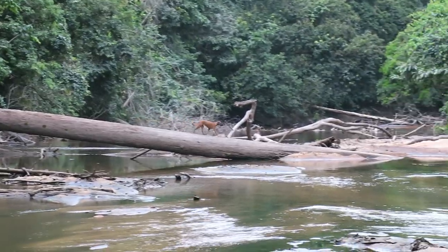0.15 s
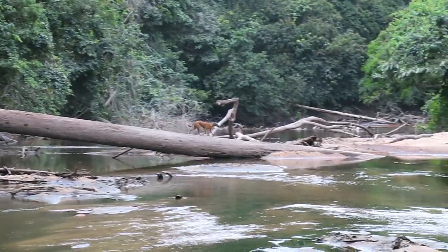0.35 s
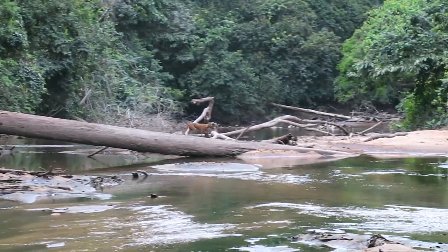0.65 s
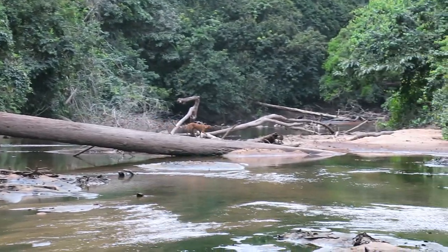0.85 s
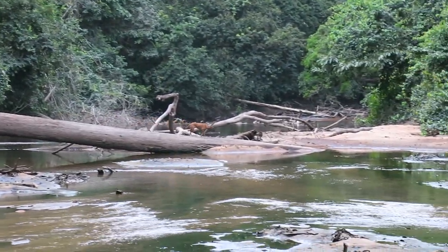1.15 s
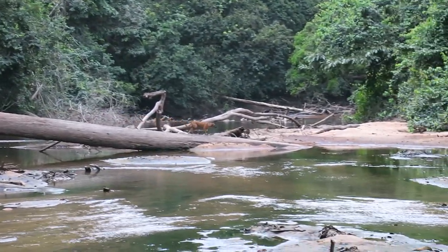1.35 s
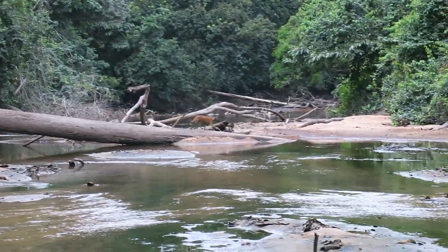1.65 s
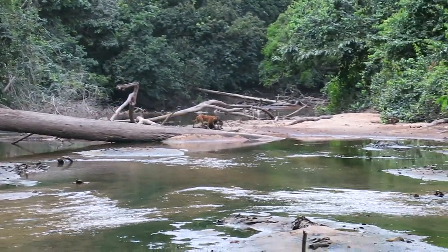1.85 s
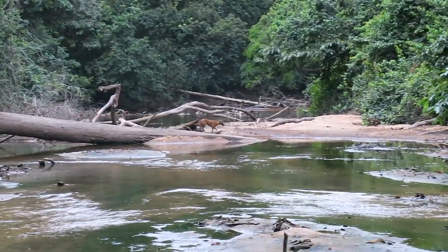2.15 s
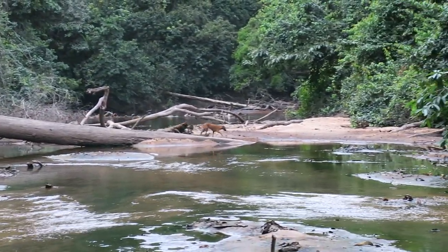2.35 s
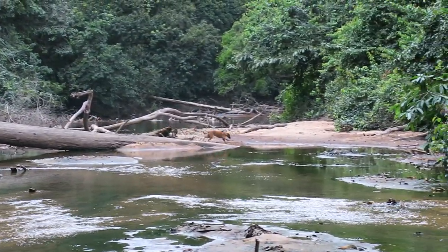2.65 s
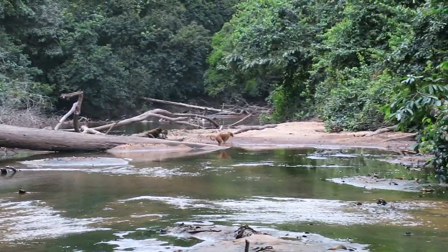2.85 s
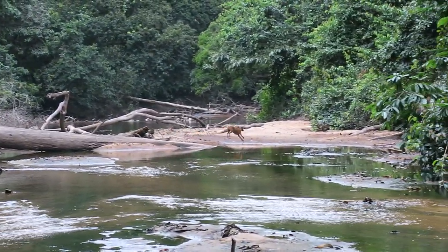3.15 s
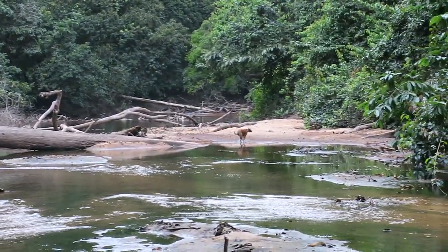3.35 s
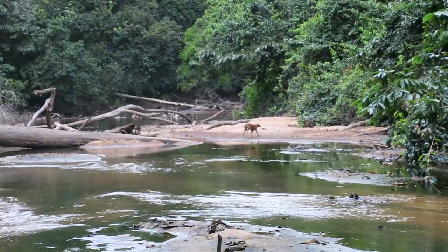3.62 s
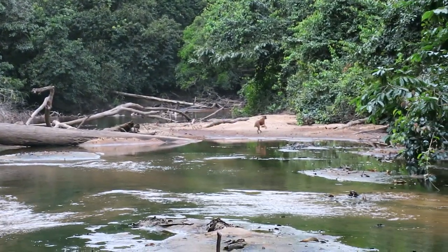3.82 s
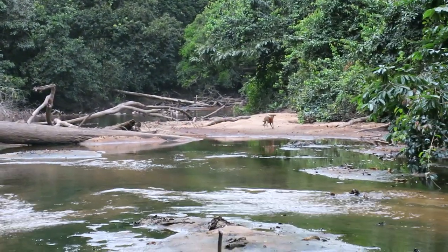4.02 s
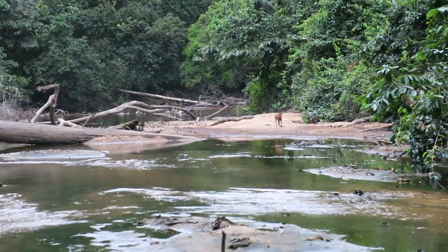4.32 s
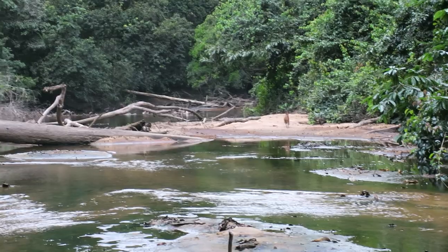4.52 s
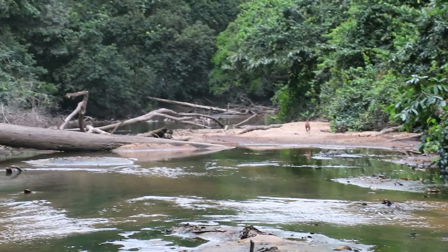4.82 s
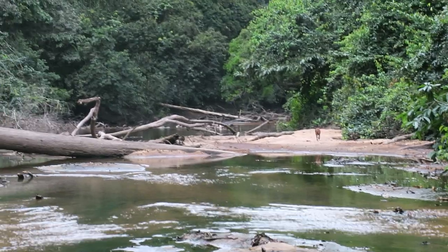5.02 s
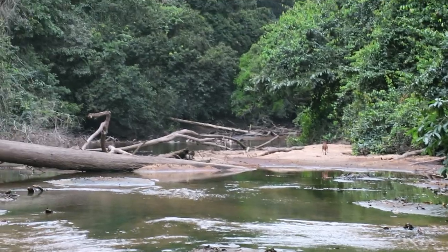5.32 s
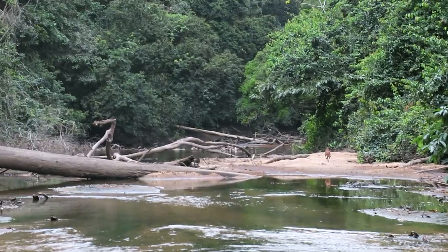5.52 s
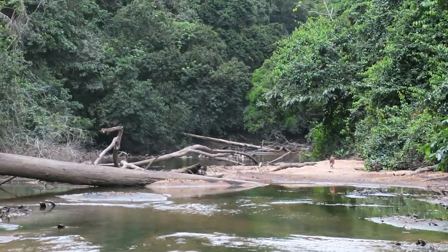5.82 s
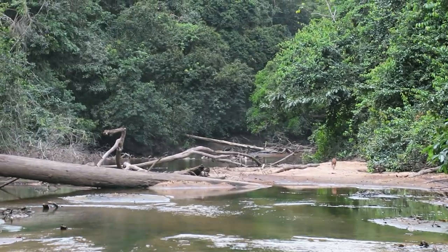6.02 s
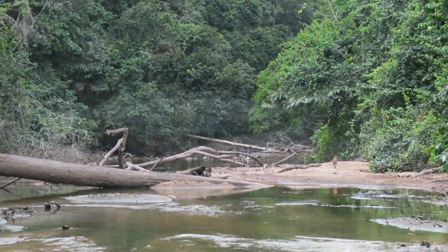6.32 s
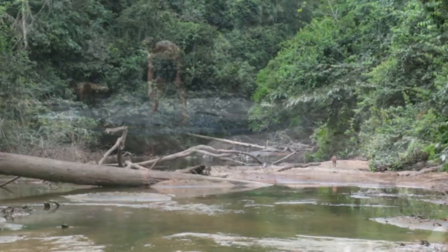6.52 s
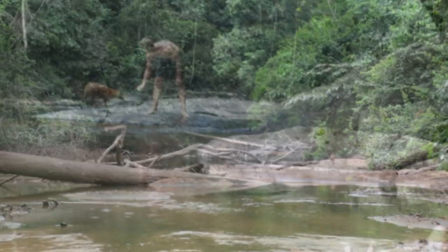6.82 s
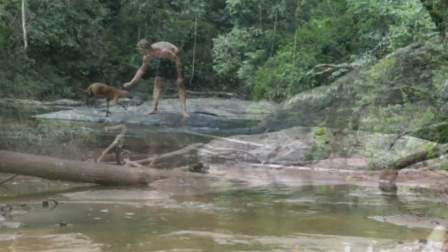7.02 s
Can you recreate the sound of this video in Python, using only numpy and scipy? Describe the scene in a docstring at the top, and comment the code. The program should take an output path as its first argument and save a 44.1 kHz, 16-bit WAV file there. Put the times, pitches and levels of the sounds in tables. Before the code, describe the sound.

A shrill steady cicada chorus over soft far river wash, small splashes, one loud microphone thump, then closer bubbling rapids swelling in at the end.

```python
"""Rainforest river with cicadas

A cicada chorus (noise in body resonances) shrills over far water (noise and damped bubble sines). One insect
repeats three rising notes; small splashes, a gliding chirp and faint held tones pass. A knock on the camera, a
damped push, overloads it: its bass thins and its gain creeps back up. Near the end the scene changes: closer
rapids fade in while the far water and the cicadas fade away."""
import sys
import numpy as np
from scipy import signal
from scipy.fft import rfft, irfft, next_fast_len
from scipy.io import wavfile
from scipy.ndimage import uniform_filter1d, map_coordinates

SR = 44100
rng = np.random.default_rng(int(sys.argv[2]) if len(sys.argv) > 2 else 0)


def to_wav(s):
    """Save 16-bit WAV."""
    ch = np.atleast_2d(s).T  # columns
    pcm = np.round(np.clip(ch, -1, 1) * 32767)  # PCM
    wavfile.write(sys.argv[1], SR, pcm.astype(np.int16))


N = 316197  # samples

# source levels are those ahead of the wind filter and gain control


def amp(db):
    """Decibels to gain."""
    return 10 ** (np.asarray(db) / 20)


def unit(x):
    """Scaled to rms 1 over all channels."""
    return x / np.sqrt(np.mean(x ** 2) + 1e-20)


def clock():
    """The time of every sample in seconds."""
    return np.arange(N) / SR


def ramp(start_s, length_s):
    """Rises from 0 to 1 over length_s."""
    return np.clip((clock() - start_s) / length_s, 0, 1)


def along(points, hz):
    """(Hz, value) points read on a log frequency axis."""
    f, v = np.transpose(points)
    return np.interp(np.log(hz + 1), np.log(f), v)


def wobble(rate_hz):
    """A smooth random curve, rate_hz knots a second."""
    knots = rng.standard_normal(int(N * rate_hz / SR) + 4)
    return map_coordinates(knots, [clock() * rate_hz])


def filtered(x, response):
    """x times a zero-phase response of frequency."""
    size = x.shape[-1]
    padded = next_fast_len(size + 8192)
    spectrum = rfft(x, padded) * response(np.fft.rfftfreq(padded, 1 / SR))
    return irfft(spectrum, padded)[..., :size]


def coloured(x, spectrum):
    """x shaped by (Hz, dB) points, at rms 1."""
    return unit(filtered(x, lambda hz: amp(along(spectrum, hz))))


def humps(modes, hz):
    """Gain of steep resonances whose powers add."""
    power = 0
    for centre_hz, width_hz, db in modes:
        power = power + amp(db) ** 2 / (1 + ((hz - centre_hz) / width_hz) ** 2) ** 3
    return np.sqrt(power)


def pan(left_right_db):
    """Channel gains for a left-right difference."""
    return amp([[left_right_db / 2], [-left_right_db / 2]])


def left_right(mid, side):
    """Mid and side to left and right."""
    return np.array([mid + side, mid - side])


def spread(pair, likeness):
    """Mixes two unrelated signals to a given left-right correlation."""
    turn = np.arccos(np.clip(likeness, -1, 1)) / 2
    return left_right(np.cos(turn) * pair[0], np.sin(turn) * pair[1])


def patchy(depth_db):
    """Two noises with patches of gain that drift over time and frequency."""
    z = signal.stft(rng.standard_normal((2, N)), nperseg=512)[2]
    across_hz = uniform_filter1d(rng.standard_normal(z.shape), size=4, axis=1)
    field = uniform_filter1d(across_hz, size=10, axis=2)
    noise = signal.istft(z * amp(depth_db * unit(field)), nperseg=512)[1]
    return unit(noise[:, :N])


def bubbles(count, centre_hz, cycles, scatter_db):
    """Small bubbles: short damped sines that rise in pitch."""
    u = rng.random((count, 4))
    t = np.arange(SR // 50) / SR
    hz = centre_hz * 2 ** (2 * (u[:, 1:2] + u[:, 2:3] - 1))
    age = t * hz / cycles  # in decay times
    size = amp(-scatter_db * np.log(1 - .99 * u[:, 3:]))
    ring = size * np.exp(-age) * np.sin(2 * np.pi * hz * t * (1 + .04 * np.minimum(age, 4)))
    where = (u[:, :1] * N).astype(int) + np.arange(len(t))
    return unit(np.bincount(where.ravel(), ring.ravel(), N)[:N])


def burst(start_s, rise_s, t60_s):
    """An envelope that swells from start_s and dies away."""
    t = np.maximum(clock() - start_s, 0)
    return np.minimum(t / rise_s, 1) * amp(-60 * np.maximum(t - rise_s, 0) / t60_s)


def forest(x):
    """The diffuse answer of the trees: decaying noise, different at each ear."""
    # columns: frequency_hz, t60_s
    decay = [(200, .4), (2000, .6), (8000, 0.42), (14000, .2)]
    hz, t, z = signal.stft(rng.standard_normal((2, SR // 2)), SR, nperseg=256)
    fade = amp(-60 * t / along(decay, hz)[:, None])
    tail = signal.istft(z * fade, SR, nperseg=256)[1]
    return signal.fftconvolve(x[None], tail / np.linalg.norm(tail[0]), axes=1)[:, :N]


def crossfade(start_s=6.064, length_s=0.86):
    """The crossfade between the two scenes: 0 at the far reach of the river, 1 at the rapids."""
    return ramp(start_s, length_s)


def cicadas(level_db=-48, flutter_db=0.08, edge_hz=9330, left_db=2.0, end_s=6.975,
            after_db=-64, recede_db=6):
    """Countless tymbal clicks merge into noise in the resonances of the insects' bodies."""
    # body resonances: centre_hz, width_hz, relative_db
    tymbals = [(2766, 100, -19.5), (4490, 260, -22.5), (5095, 100, -20), (5790, 260, -21.5),
               (6317, 330, -13), (7200, 380, -13), (7547, 320, -3), (7840, 20, -2.5), (7936, 350, -7),
               (8930, 280, -13), (9240, 150, -23)]
    body = lambda hz: humps(tymbals, hz) / np.sqrt(1 + (hz / edge_hz) ** 160)
    chorus = unit(filtered(spread(patchy(depth_db=0.3), -0.2), body))
    flutter = amp(flutter_db * wobble(70) + 0.26 * wobble(5.74))
    singing = (1 - ramp(end_s, 0.0082)) * amp(level_db - recede_db * crossfade())
    # a thinner, more distant chorus stays beside the rapids
    thin_body = lambda hz: humps([(6900, 700, -2), (7640, 350, 0)], hz)
    distant = unit(filtered(rng.standard_normal((2, N)), thin_body))
    return chorus * flutter * singing * pan(left_db) + distant * amp(after_db) * crossfade()


def lone_insect(direct_db=-10.5, echo_db=-4.0, overlap=1.6):
    """Three thin notes, each a step higher and purer, run together and smeared by the trees."""
    # calls: start_s, level_db (ahead of the direct and echo gains), note_spacing_s, reference_pitch_hz
    calls = [(0.607, -49.5, 0.089, 7324), (2.245, -49, 0.086, 7340), (3.11, -48.5, .088, 7370),
             (4.075, -48, 0.099, 7315), (5.072, -50.5, .092, 7350), (6.081, -52, 0.078, 7320)]
    # steps of a call: offset_hz from the reference pitch, rasp_hz, relative_db
    notes = [(-265, 64, -2), (-140, 48, .5), (1, 22, 3.5)]
    t, song = clock(), np.zeros(N)
    for start_s, db, spacing_s, reference_hz in calls:
        for step, (offset_hz, rasp_hz, note_db) in enumerate(notes):
            u = ((t - start_s) / spacing_s - step) / overlap  # 0-1 through the note
            on = (u > 0) & (u < 1)
            rasp = map_coordinates(rng.standard_normal(100), [u[on] * spacing_s * 300])
            phase = 2 * np.pi * np.cumsum(reference_hz + offset_hz + rasp_hz * rasp) / SR
            song[on] += amp(db + note_db) * np.sqrt(2 * np.sin(np.pi * u[on])) * np.sin(phase)
    return (amp(direct_db) * song + amp(echo_db) * forest(song)) * pan(2.2)


def rapids(level_db=-49, bubble_share=0.31, churn_db=1.3):
    """Close water: dense bubbles straight ahead, with wider spray; it fades in as the scene changes."""
    # spectrum: frequency_hz, relative_db
    near_water = [(50, -15), (180, -3.5), (330, 0.5), (650, -3.5), (1150, 0), (1700, -1.5), (2500, -6.5),
                  (3500, -12.5), (5500, -20), (8000, -34.5), (12000, -30), (15500, -30.5)]
    flow = patchy(depth_db=1.4)
    flow[0] += bubble_share * bubbles(count=5000, centre_hz=1091, cycles=9.1, scatter_db=2.0)
    width = lambda hz: along([(300, .25), (1300, 0.26), (3000, 0.32), (6000, 1.0)], hz)
    water = coloured(left_right(flow[0], filtered(flow[1], width)), near_water)
    return water * crossfade() * amp(level_db + churn_db * wobble(9))


def river(level_db=-58.5, bubble_share=0.22, recede_db=4):
    """Far water: a wide, steady wash with a fine gurgle."""
    # spectrum: frequency_hz, relative_db
    far_water = [(60, -33), (160, -3), (330, -1.5), (600, -5.5), (1100, -6), (1500, -7), (2200, -8),
                 (3300, -12), (5300, -16.5), (8500, -15), (10000, -55), (15000, -60.5)]
    # left-right correlation: frequency_hz, likeness
    water_alike = [(150, .3), (450, -0.031), (1000, -0.041), (2200, -0.23), (4500, -.12)]
    gurgle = np.array([bubbles(count=2500, centre_hz=1209, cycles=5.6, scatter_db=1.5) for _ in range(2)])

    def mid_side_gains(hz):
        """Gains that set the correlation at each frequency."""
        turn = np.arccos(np.clip(along(water_alike, hz), -1, 1)) / 2
        return np.array([np.cos(turn), np.sin(turn)])

    mid, side = filtered(patchy(depth_db=1.1) + bubble_share * gurgle, mid_side_gains)
    wash = coloured(left_right(mid, side), far_water)
    return wash * amp(level_db - recede_db * crossfade()) * pan(1.1)


def surges():
    """Now and then a duller rush swells and sinks under the wash."""
    # swells: crest_s, half_length_s, level_db
    swells = [(.03, 0.6, -57), (1.285, 0.68, -55), (5.683, 0.55, -60.5)]
    # spectrum: frequency_hz, relative_db
    dull_rush = [(80, -24.5), (180, -6.5), (330, 2.5), (650, -9), (1050, -2), (1500, -14.5), (2100, -11.5),
                 (3200, -34), (8000, -53)]
    rush = coloured(spread(patchy(depth_db=3.5), .1), dull_rush)
    swell = sum(amp(db) * np.sin(np.pi * ramp(crest_s - half_s, 2 * half_s)) ** 2
                for crest_s, half_s, db in swells)
    return rush * swell * pan(.8)


def splashes(dull_hz=2600, bubble_t60_s=.049):
    """Short sprays of droplets, some dulled in the treble; some trap a bubble that rings briefly."""
    # events: start_s, level_db, rise_s, t60_s, brightness (0-1), left_right_db, bubble_hz,
    # bubble_strength (0 = none)
    events = [(3.04, -54.5, .0035, .16, 0.9, 4, 0, 0), (3.074, -57, .025, .75, 1, 4.5, 0, 0),
              (3.44, -55, .008, 0.57, 0.8, 3, 2360, 0.99), (3.53, -57, .018, .5, .6, 8, 8, 0),
              (3.566, -42, .0027, 0.068, .5, 1.5, 2500.5, 0.55),
              (6.441, -48, .0038, 0.08, .15, 7.5, 2481, 0.63),
              (6.604, -46.3, .005, 0.092, 0.1, 4, 2629.5, .55), (6.645, -55, 0.0037, 0.039, 0, 5, 0, 0),
              (6.72, -49, 0.0036, 0.062, 0.2, 6, 2797, .7), (6.765, -47, .004, .049, 0.5, 3, 2902, 0.56)]
    # spectrum: frequency_hz, relative_db
    spray_spectrum = [(100, -19), (300, 6.5), (1200, -3), (2700, -1.5), (4000, 0), (7000, -14.5),
                      (10000, -40.5), (14000, -43)]
    grains = rng.standard_normal((2, N)) * amp(2.5 * wobble(500))
    spray = spread(coloured(grains, spray_spectrum), 0.22)
    dull = unit(filtered(spray, lambda hz: 1 / (1 + (hz / dull_hz) ** 4)))
    out = np.zeros((2, N))
    for start_s, db, rise_s, t60_s, bright, left_right_db, bubble_hz, strength in events:
        droplets = burst(start_s, rise_s, t60_s) * (bright * spray + (1 - bright) * dull)
        ring = burst(start_s, 0.0027, bubble_t60_s) * np.sin(2 * np.pi * bubble_hz * clock())
        out += amp(db) * (droplets + strength * ring) * pan(left_right_db)
    return out


def chirp(start_s=3.377, length_s=.058, start_hz=560, end_hz=2000, level_db=-51.5, fade_db=6.5):
    """One quick whistle that sweeps upward ever faster."""
    u = ramp(start_s, length_s)
    hz = start_hz * (end_hz / start_hz) ** (u ** 1.7)
    envelope = amp(level_db - fade_db * u) * np.sqrt(2 * np.abs(np.sin(np.pi * u)))
    tone = envelope * np.sin(2 * np.pi * np.cumsum(hz) / SR)
    return tone * pan(1.1) + amp(-17.5) * forest(tone)


def knock(start_s=3.62037, left_db=30.0, right_db=21.5, left_s=.00062, right_s=0.00027,
          jolt_db=29.5, jolt_s=0.00048, coupling_hz=34.7, lag_s=.0001):
    """A knock pushes both microphone capsules; the nearer one is first jolted the other way."""
    t = np.maximum(clock() - start_s, 0)
    push = lambda db, u: amp(db) * np.maximum(u, 0) * np.exp(1 - u)
    left = push(left_db, t / left_s) - push(jolt_db, t / jolt_s)
    right = push(right_db, (t - lag_s) / right_s)
    # the input passes no steady pressure, so the push swings back as a thump
    high_pass = signal.butter(2, coupling_hz, "high", fs=SR)
    return signal.lfilter(*high_pass, np.array([left, right]))


def handling(tap_db=-15):
    """Fingers tick on the camera's case: a dry tap and the ring of the shell."""
    # ticks: start_s, level_db, left_right_db
    ticks = [(4.040, -41, 2), (4.199, -41.5, 2)]
    # shell resonances: centre_hz, width_hz, relative_db
    shell = [(353, 43, 3.5), (567, 52, 2), (980, 160, -5), (1598, 216, -8), (2560, 660, -7.5),
             (3300, 950, -26)]
    ring = unit(filtered(spread(rng.standard_normal((2, N)), 0.6), lambda hz: humps(shell, hz)))
    tap = amp(tap_db) * coloured(rng.standard_normal(N), [(4000, 0), (10000, -35)])
    envelope = sum(amp(db) * burst(start_s, rise_s=0.012, t60_s=0.056) * pan(left_right_db)
                   for start_s, db, left_right_db in ticks)
    return (ring + tap) * envelope


def held_tones(fade_s=0.049):
    """Faint, unsteady hums and whines: narrow bands of noise that come and go."""
    # tones: start_s, end_s, pitch_hz, width_hz, level_db
    tones = [(2.68, 3.08, 3765, 20, -74), (3.68, 3.841, 3520, 22, -69), (4.285, 5.905, 343.4, 35, -74),
             (4.3, 5.0, 527, 25, -70.5), (4.302, 5.248, 1194, 39, -71), (5.05, 6.247, 133, 20, -67)]
    t, out = clock(), np.zeros(N)
    for start_s, end_s, pitch_hz, width_hz, db in tones:
        line = unit(filtered(rng.standard_normal(N), lambda hz: humps([(pitch_hz, width_hz, 0)], hz)))
        out += amp(db) * line * np.clip(np.minimum(t - start_s, end_s - t) / fade_s, 0, 1)
    return out


def rumble(level_db=-63.5):
    """Low, uneven noise, nearly the same at both ears."""
    # spectrum: frequency_hz, relative_db
    air_spectrum = [(15, -10.5), (45, -5.5), (90, 0.5), (150, -4), (260, -9.5), (600, -37.5), (2000, -89)]
    air = coloured(spread(rng.standard_normal((2, N)), .88), air_spectrum)
    return air * amp(level_db + 1.1 * wobble(7.6)) * pan(.9)


def scene():
    """Forest, water and the knocks and ticks on the camera."""
    animals = cicadas() + lone_insect() + chirp()
    water = rapids() + river() + surges() + splashes()
    return animals + water + knock() + handling() + held_tones() + rumble()


def wind_filter(x, trip_level=.5, delay_s=0.326, hold_s=2.08, release_s=1.0, corner_hz=1250,
                low_cut_hz=215, cut_db=-20):
    """Shortly after the first strong peak, cuts the bass and narrows the low range for a while."""
    tripped_s = np.argmax(np.abs(x).max(axis=0) > trip_level) / SR + delay_s
    engaged = ramp(tripped_s, .02) - ramp(tripped_s + hold_s, release_s)
    mid, side = (x[0] + x[1]) / 2, (x[0] - x[1]) / 2
    bass_cut = lambda hz: np.maximum(hz ** 2 / np.hypot(hz ** 2, low_cut_hz ** 2), amp(cut_db))
    lean = filtered(mid, bass_cut)
    thin = filtered(side, lambda hz: hz / np.hypot(hz, corner_hz))
    return left_right(mid + engaged * (lean - mid), side + engaged * (thin - side))


def gain_control(x, slow_threshold_db=-12.5, slow_release_db_per_s=9.1, fast_threshold_db=-19,
                 fast_release_db_per_s=90, smoothing_s=0.0095):
    """An overload turns the gain down; it recovers quickly at first, then slowly."""
    t = clock()
    level_db = 20 * np.log10(np.clip(np.abs(x).max(axis=0), 1e-6, 1))
    held = lambda release: np.maximum.accumulate(level_db + release * t) - release * t
    slow_db = held(slow_release_db_per_s) - slow_threshold_db
    fast_db = held(fast_release_db_per_s) - fast_threshold_db
    cut_db = np.maximum(0, np.maximum(slow_db, fast_db))
    keep = np.exp(-1 / (smoothing_s * SR))
    return x * amp(-signal.lfilter([1 - keep], [1, -keep], cut_db))


def record(dry, hiss_db=-70, top_hz=15700):
    """Wind filter, gain control, the camera's own hiss, clipping at full scale and its band limit."""
    # hiss spectrum: frequency_hz, relative_db
    preamp = [(80, -22.5), (180, -11.5), (330, -1), (1000, -5.5), (4000, -9), (8500, -16), (10000, -60)]
    hiss = amp(hiss_db) * coloured(spread(rng.standard_normal((2, N)), 0.52), preamp)
    clipped = np.clip(gain_control(wind_filter(dry)) + hiss, -1, 1)
    return filtered(clipped, lambda hz: (hz < top_hz) / np.sqrt(1 + (hz / 11800) ** 14))


dry = scene()
out = record(dry)
to_wav(out)
```